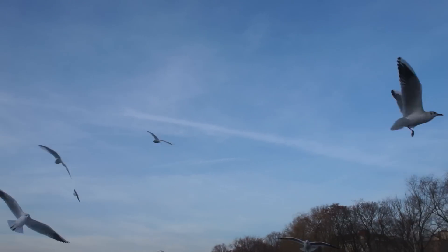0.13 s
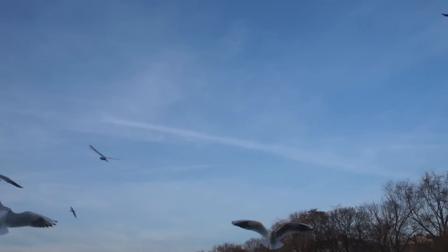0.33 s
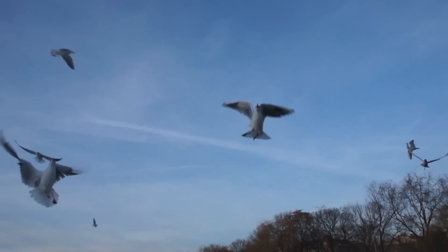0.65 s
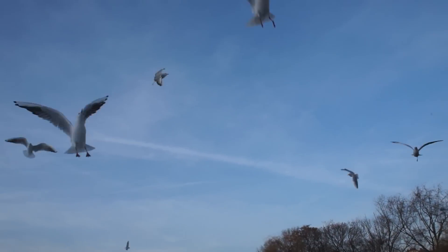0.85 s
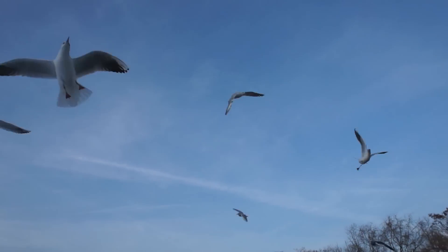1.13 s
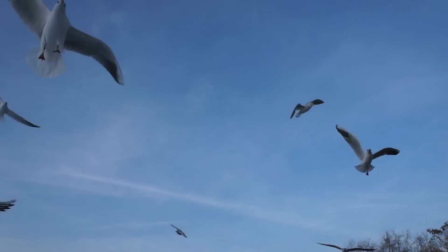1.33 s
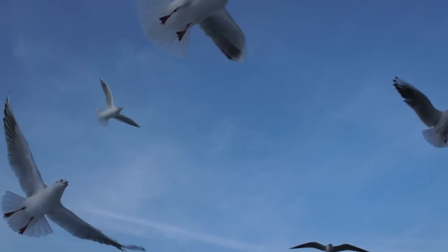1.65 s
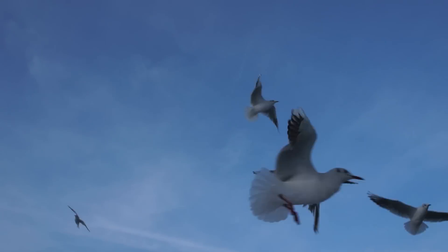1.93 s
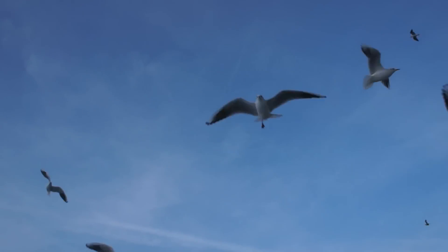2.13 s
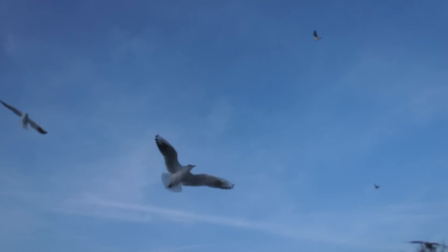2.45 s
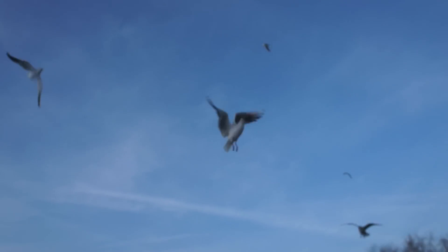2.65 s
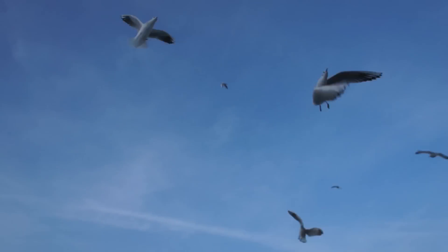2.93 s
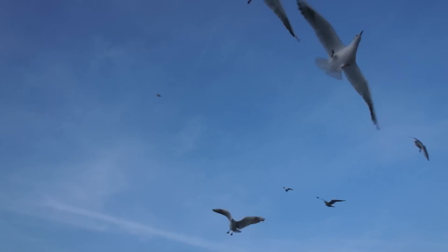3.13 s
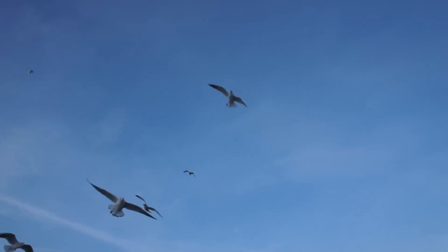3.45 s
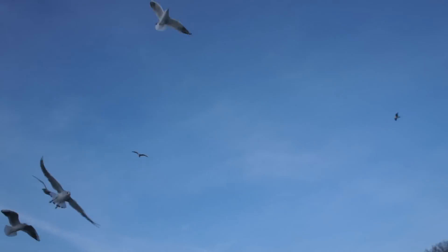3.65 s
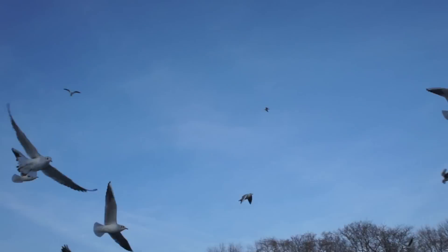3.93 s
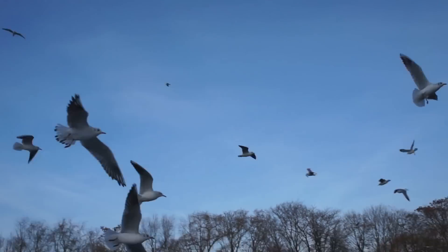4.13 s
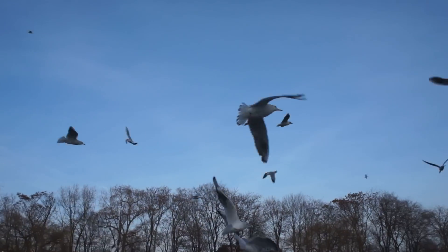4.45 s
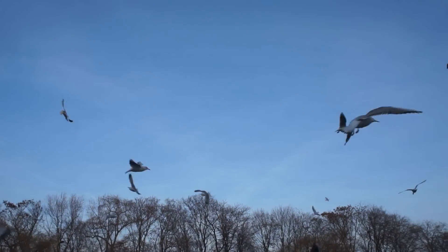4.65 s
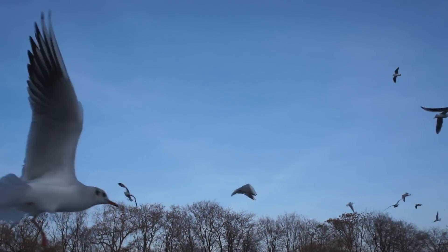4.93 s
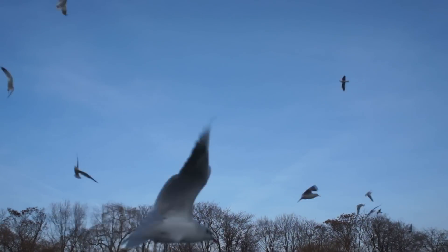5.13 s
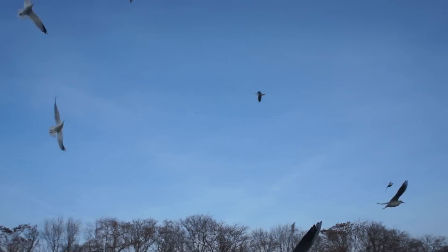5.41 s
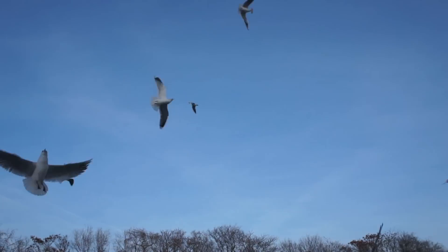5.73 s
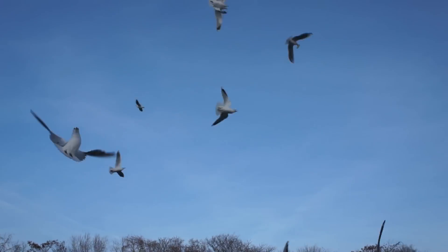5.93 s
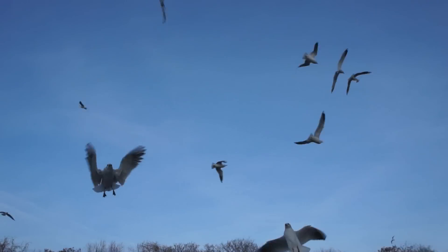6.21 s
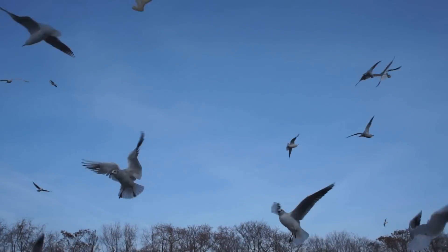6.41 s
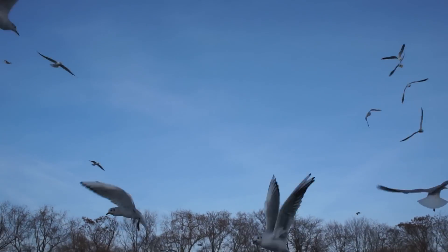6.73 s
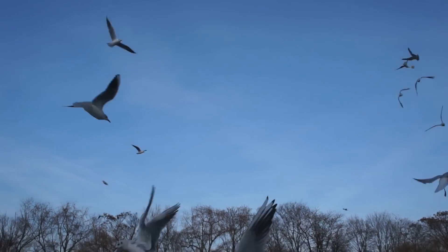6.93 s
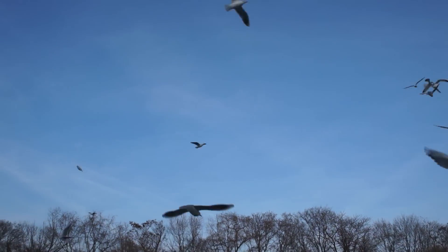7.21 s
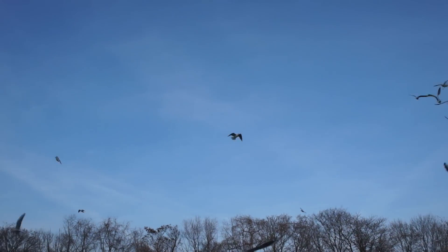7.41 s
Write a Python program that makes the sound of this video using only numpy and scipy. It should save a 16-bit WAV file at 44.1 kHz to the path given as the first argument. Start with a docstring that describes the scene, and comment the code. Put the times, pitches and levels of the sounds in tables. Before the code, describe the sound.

A steady outdoor hiss, a low rumble and the swelling wash of a distant gull flock run throughout. From the start to about 2 seconds, near gulls give a quick, overlapping string of short, harsh squawks, with a thin whistle around 1.6 seconds. Dull wingbeats thump irregularly all along, with occasional feather rustles and small wing snaps, clearest near 3.2 seconds. From about 2.5 to 4.5 seconds, farther birds cackle softly with a light echo from the trees, and close squawks are sparser. High, quavering whistles come at about 4 and 5.4 seconds. The loudest runs from 5.7 to 6.4 seconds, falling slightly and splitting into several tones, among squawks and short yelps. A softer whistle follows from 6.6 to 7.2 seconds. A low breeze builds on the microphone from 6.5 seconds, and a last squawk and whistle sound near 7.5 seconds.

```python
"""Open air under a wheeling flock of gulls. Near birds squawk and yelp: a rattling syrinx buzz shaped
by the throat. Their thin, mostly falling whistles split at times as a second membrane joins in.
Farther birds cackle, and trees echo the calls. Wings thump and snap, feathers rustle as birds brake.
Behind lie steady hiss, outdoor rumble and the wash of the far flock; a breeze rises at the end."""
import sys
import numpy as np
from scipy import signal
from scipy.fft import rfft, irfft, next_fast_len
from scipy.io import wavfile
from scipy.ndimage import uniform_filter1d, map_coordinates

SR = 44100
rng = np.random.default_rng(int(sys.argv[2]) if len(sys.argv) > 2 else 0)


def int16_out(signal):
    """Quantize to a 16-bit WAV file."""
    q = np.round(np.clip(np.atleast_2d(signal).T, -1, 1) * 32767)
    wavfile.write(sys.argv[1], SR, q.astype(np.int16))


N = 333837

# left-right correlation of the background: f/Hz, correlation
AMBIENT_CORRELATION = [(60, 0.6), (150, 0.81), (360, 0.92), (870, 0.66), (2140, 0), (5220, -0.34),
                       (12800, 0.16)]
# one contour per whistle: t/s, pitch/Hz, level/dB
WHISTLE_CONTOURS = [
    [(1.585, 3710, -20), (1.625, 3720, -19.5), (1.676, 3680, -19.5), (1.71, 3250, -31)],
    [(3.93, 2970, -28), (3.968, 3360, -22), (4.025, 3460, -25.5), (4.072, 3380, -25.5), (4.116, 2925, -29),
     (4.17, 2795, -29.5), (4.228, 2910, -38), (4.24, 2700, -37)],
    [(5.35, 3440, -53), (5.39, 3960, -32.5), (5.422, 4270, -20.5), (5.47, 4140, -21), (5.53, 4020, -21.5),
     (5.55, 3730, -39), (5.6, 3300, -41)],
    [(5.69, 3000, -40), (5.7, 3054, -13.5), (5.722, 3160, -14), (5.75, 3444, -26.5), (5.822, 3470, -25.5),
     (5.852, 3153, -11), (5.952, 2930, -15), (6.052, 2926, -17), (6.164, 2840, -20), (6.204, 2830, -28.5),
     (6.298, 2870, -20), (6.344, 2794, -27), (6.356, 2875, -45), (6.4, 2904, -39)],
    [(6.59, 3434, -26.5), (6.645, 3230, -36.5), (6.732, 3105, -24), (6.796, 2976, -25), (6.84, 3075, -24),
     (6.885, 2985, -25), (7.04, 3075, -24.5), (7.085, 2870, -22), (7.18, 2870, -29)],
    [(6.865, 3050, -32), (6.901, 2740, -29), (6.98, 2450, -36)],
    [(7.48, 3700, -30), (7.49, 3644, -18.5), (7.538, 3650, -13), (7.565, 3760, -19)],
]


def amp(db):
    """Decibels to gain."""
    return 10 ** (np.asarray(db) / 20)


def unit(x):
    """Scale to rms 1."""
    return x / np.sqrt(np.mean(x ** 2) + 1e-20)


def along(points, hz):
    """Interpolate (f/Hz, value) points on a log axis."""
    f, values = np.transpose(points)
    return np.interp(np.log(hz + 1), np.log(f + 1), values)


def curves(rows, t):
    """Interpolate each column after the first at times t."""
    times, *columns = np.transpose(rows)
    return [np.interp(t, times, column) for column in columns]


def wobble(rate_hz, size):
    """Smooth random curve, rate_hz knots a second."""
    knots = rng.standard_normal(int(size * rate_hz / SR) + 4)
    return map_coordinates(knots, [np.arange(size) * rate_hz / SR])


def filtered(x, response):
    """Apply a frequency response."""
    size = x.shape[-1]
    padded = next_fast_len(size + 4096)
    hz = np.fft.rfftfreq(padded, 1 / SR)
    return irfft(rfft(x, padded) * response(hz), padded)[..., :size]


def resonance(hz, centre_hz, q):
    """Band-pass gain with steep skirts."""
    ratio = (hz + 1) / centre_hz
    return 1 / (1 + (q * (ratio - 1 / ratio)) ** 2)


def fade(t, start, end, edge):
    """Soft-edged window from start to end."""
    return np.sin(np.pi / 2 * np.clip(np.minimum(t - start, end - t) / edge, 0, 1)) ** 2


def add(out, start_s, sound, pan_db=0):
    """Mix a sound in; pan is left minus right."""
    first = max(round(start_s * SR), 0)
    part = out[:, first:first + sound.shape[-1]]
    part += (sound * amp([[pan_db / 2], [-pan_db / 2]]))[:, :part.shape[1]]


def two_ports(phase, lead_rad):
    """A tone at two microphone ports, the left leading."""
    return np.sqrt(2) * np.sin(phase + lead_rad * np.array([[.5], [-.5]]))


def puff(length_s, rise_s):
    """Two noise channels with a fast rise and exponential decay."""
    t = np.arange(SR // 6) / SR
    noise = rng.standard_normal((2, len(t)))
    return noise * (1 - np.exp(-t / rise_s)) * np.exp(-2 * t / max(length_s, .004))


def rush(spectrum, correlation, patchy_db):
    """Stereo noise of rms 1 with random gain patches in time and frequency."""
    def mid_side(hz):
        angle = np.arccos(np.clip(along(correlation, hz), -1, 1)) / 2
        return amp(along(spectrum, hz)) * [np.cos(angle), np.sin(angle)]

    bins = signal.stft(rng.standard_normal((2, N)), nperseg=512)[2]
    patches = uniform_filter1d(rng.standard_normal(bins.shape[1:]), size=4, axis=0)
    patches = unit(uniform_filter1d(patches, size=8, axis=1))
    noise = signal.istft(bins * amp(patchy_db * patches), nperseg=512)[1][:, :N]
    mid, side = filtered(noise, mid_side)
    return unit(np.array([mid + side, mid - side]))


def hiss(level_db=-43.5, drift_db=1.5):
    """Broad hiss, drifting slightly in level."""
    spectrum = [(30, -21), (200, 3), (800, 4.5), (2500, 7), (5000, 4), (8000, 5), (11500, 3), (12300, -16),
                (13200, -30)]  # f/Hz, density/dB
    gain = amp(level_db + drift_db * wobble(6, N))
    return gain * rush(spectrum, AMBIENT_CORRELATION, patchy_db=1.5)


def rumble(flutter_db, level_db=-41.5):
    """Distant outdoor rumble, a little to the right."""
    spectrum = [(25, -24), (60, -18), (140, -7), (250, 2), (400, -2.5), (700, -6), (1200, -11), (3000, -41)]  # f/Hz, density/dB
    noise = rush(spectrum, AMBIENT_CORRELATION, patchy_db=3.5)
    return amp(level_db + flutter_db) * noise * amp([[-1.2], [1.2]])


def breeze(gust_db=5.5):
    """Low gusts of wind at the microphone."""
    spectrum = [(20, -59), (50, -10), (90, -5.5), (140, -0.5), (220, -2.5), (400, -17.5), (900, -63)]  # f/Hz, density/dB
    strength = [(0, -62), (.65, -41), (1.05, -67), (3.1, -68), (3.7, -56), (4.3, -73), (5.9, -67),
                (6.45, -54), (6.6, -42.5), (7.2, -33.5), (7.57, -25.5)]  # t/s, level/dB
    level_db, = curves(strength, np.arange(N) / SR)
    gain = amp(level_db + gust_db * wobble(12, N))
    return gain * rush(spectrum, correlation=[(100, -0.52)], patchy_db=2) * amp([[-4], [2.5]])


def far_flock(flutter_db):
    """The far flock blurs into a swelling wash."""
    spectrum = [(60, -59), (300, -22), (700, -4), (1000, -0.5), (1800, 0.5), (2600, -10.5), (4500, -11.5),
                (9000, -46)]  # f/Hz, density/dB
    swells = [(0, -38.5), (.8, -37), (1.15, -34), (1.7, -33.5), (2.2, -43.5), (2.8, -36), (3.7, -47.5),
              (4.2, -37.5), (4.5, -45), (5.35, -42.5), (6.2, -43), (6.6, -49), (7.1, -37.5), (7.57, -38.5)]  # t/s, level/dB
    level_db, = curves(swells, np.arange(N) / SR)
    return amp(level_db + 1.1 * flutter_db) * rush(spectrum, AMBIENT_CORRELATION, patchy_db=3.5)


def tree_echo(x):
    """Diffuse echo from the bank and the trees."""
    decay = [(200, 0.16), (2000, 1), (10000, 0.99)]  # f/Hz, T60/s
    hz, t, bins = signal.stft(rng.standard_normal((2, SR // 2)), SR, nperseg=256)
    tail = signal.istft(bins * amp(-60 * t / along(decay, hz)[:, None]), SR, nperseg=256)[1]
    return signal.fftconvolve(x, tail / np.linalg.norm(tail[0]), axes=1)[:, :N]


def hum(start_s=4.622, start_hz=170, level_db=-33):
    """One brief, low, rising hum."""
    out = np.zeros((2, N))
    t = np.arange(0, .055, 1 / SR)
    tone = np.sin(2 * np.pi * start_hz * t * (1 + 1.5 * t))
    add(out, start_s, amp(level_db) * tone * fade(t, 0, t[-1], 0.0072))
    return out


def wing_beats(far_count=14, far_db=-40, far_hz=350, crest_db=15):
    """Down strokes push dull puffs of air; the far ones fall at random."""
    near = [(.346, -25, 242, -1), (.488, -22.5, 340, 0), (.625, -27, 277, 1), (1.135, -29, 276, -2),
            (2.201, -23, 405, 1), (2.343, -22, 335, 0), (2.521, -29.5, 476, 2), (2.692, -24.5, 347, -.5),
            (2.987, -24, 547, 0), (3.21, -28.5, 395, -1), (3.568, -19.5, 358, 0), (3.611, -22.5, 744, -3),
            (4.069, -30, 480, 2), (4.324, -24, 382, 1), (4.498, -42, 865, 5), (4.611, -27.5, 444, 1),
            (4.866, -21, 900, 3), (4.924, -24, 740, 0), (4.981, -22.5, 660, 3), (5.087, -30, 433, 2),
            (5.937, -30, 296, 1), (6.916, -25, 285, 2), (7.215, -20.5, 268, -7), (7.439, -24, 334, -7),
            (7.493, -20, 223, -18.5)]  # t/s, nominal peak/dB, centre/Hz, pan/dB
    far = [(when * N / SR, far_db, far_hz * 2 ** (high - .5), 4 * (left - .5))
           for when, high, left in rng.random((far_count, 3))]
    out = np.zeros((2, N))
    for start_s, peak_db, centre_hz, pan_db in near + far:
        air = puff(length_s=0.045, rise_s=0.0017)
        mid, side = filtered(air, lambda hz: resonance(hz, centre_hz, 1.39) ** 0.75)
        thump = np.array([mid + 0.15 * side, mid - 0.39 * side])
        add(out, start_s, amp(peak_db - crest_db) * unit(thump), pan_db)
    return out


def feathers():
    """Stiff feathers crackle as they spread."""
    rustles = [(0.261, -15.5, 0.0075), (1.089, -19.5, 0.11), (1.144, -17.5, 0.11), (1.994, -24, 0.078),
               (2.696, -21.5, 0.043), (2.983, -26.5, 0.026), (3.108, -17.5, 0.16), (3.198, -17, 0.082),
               (3.66, -19, 0.0073), (6.982, -21, 0.035), (7.202, -21, 0.045), (7.329, -17.5, 0.11)]  # t/s, peak/dB, length/s
    out = np.zeros((2, N))
    for start_s, peak_db, length_s in rustles:
        grains = puff(length_s, rise_s=0.0025)
        grains *= amp(3.6 * wobble(666, grains.shape[1]))
        mid, side = filtered(grains, lambda hz: resonance(hz, 1870, 0.18))
        rustle = np.array([mid + 1.05 * side, mid - 0.54 * side])
        add(out, start_s, amp(peak_db) * rustle / np.abs(rustle).max())
    return out


def wing_snaps():
    """Wing tips snap with small clicks."""
    snaps = [(.348, -27), (2.203, -27), (2.35, -24.5), (3.207, -16.5), (4.326, -34), (4.621, -31),
             (4.847, -24.5), (4.877, -25), (5.254, -25.5), (5.965, -20.5), (7.501, -38)]  # t/s, peak/dB
    out = np.zeros((2, N))
    for start_s, peak_db in snaps:
        burst = puff(length_s=0.0086, rise_s=0.00047)[0]
        click = filtered(burst, lambda hz: resonance(hz, 690, 1) ** 0.45)
        add(out, start_s, amp(peak_db) * click / np.abs(click).max())
    return out


def syrinx(pitch_hz, effort, rattle_hz, rough, jitter=0.0627, sag=0.22, leap=.07, slip=0.51, rasp=2.1):
    """Harmonic buzz in uneven bursts; each starts on its own pitch, out of step, and sags."""
    size = len(pitch_hz)
    turns = np.cumsum(rattle_hz * (1 + 0.11 * wobble(91.3, size))) / SR + rng.random()
    within, burst = turns % 1, np.abs(turns).astype(int)
    offset, restart = rng.standard_normal((burst.max() + 1, 2))[burst].T
    detune = jitter * wobble(887.6, size) + leap * offset + sag * (.5 - within)
    hz = pitch_hz * (1 + rough * detune)
    cycles = np.cumsum(hz) / SR + uniform_filter1d(slip * rough * restart, size=40)
    harmonics = np.arange(1, 14)[:, None]
    flicker_db = 7 * np.minimum(rough, .5) * np.array([wobble(123.3, size) for _ in harmonics])
    strength = amp(flicker_db) * effort ** (0.023 * harmonics)  # high harmonics need effort
    buzz = unit((strength * np.cos(2 * np.pi * harmonics * cycles)).sum(axis=0))
    air = unit(rng.standard_normal(size) * (4.1 + np.cos(2 * np.pi * cycles))) * effort
    harsh = np.clip(rough / 0.34, 0, 1)  # gentle calls barely rattle
    gate = 1 - harsh * .9 * (1 - fade(within, 0, 1, .28))
    return (buzz + rasp * rough * air) * gate * amp(0.16 * harsh * wobble(217, size))


def throat(hz, centre_hz, q, edge_hz):
    """Response of the tract: it rings after each pulse and passes less above its edge."""
    colour = [(400, 14.5), (900, -3), (1800, 2), (3000, 3), (4500, 6), (7000, 8), (9000, 12), (12000, -3)]  # f/Hz, gain/dB
    ring = 1 / (1 + 1j * q * ((hz + 1) / centre_hz - centre_hz / (hz + 1))) ** 2
    shelf = .2 + 1 / (1 + (hz / edge_hz) ** 16)
    return amp(along(colour, hz)) * ring * shelf


def call(length_s, pitch_hz, rise, throat_hz, edge_hz, rough, pan_db, q, arch=.15, bill_hz=10300):
    """One call arches in pitch, swells and breaks up; air hisses in the bill, the neck growls."""
    u = np.linspace(0, 1, max(round(length_s * SR), 256))
    contour_hz = pitch_hz * (1 + rise * (u - .5) - arch * (2 * u - 1) ** 2)
    effort = amp(-32 * (u - .54) ** 2)
    breaking = np.clip(rough, 0, 1) * (1 + 2 * fade(u, 0, np.inf, .3)) / 3
    source = syrinx(contour_hz, effort, rattle_hz=pitch_hz / 10.4, rough=breaking)
    source *= effort * fade(u, 0, 1, 0.14)
    lead_rad = 1 + 0.75 * pan_db  # between the microphone ports, at 2 kHz
    ports = lambda hz: np.exp(1j * lead_rad * np.minimum(hz / 2000, 1.4) * np.array([[-.5], [.5]]))
    voice = unit(filtered(source, lambda hz: throat(hz, throat_hz, q, edge_hz) * ports(hz)))
    breath = np.abs(source) * rng.standard_normal((2, len(u)))
    bill_hiss = unit(filtered(breath, lambda hz: resonance(hz, bill_hz, 0.84)))
    bill_hiss *= amp(-15) * edge_hz / bill_hz * np.clip(rough / 0.16, 0, 1)
    shake = np.abs(source) * rng.standard_normal(len(u))
    growl = unit(filtered(shake, lambda hz: resonance(hz, 1020, 0.55)))
    growl *= amp(-15) * np.clip(rough / 0.36, 0, 1)
    return amp(2) * (voice + bill_hiss + growl)


def cackles(faint_count=6, faint_span_s=(2.4, 4.9), faint_hz=803, faint_db=-44.5, pan_db=-0.5):
    """Farther birds: distance leaves one or two harmonics; a few faint ones call at random."""
    calls = [(0, 0.053, 665, 0.045, -37.5, 1310), (.733, 0.036, 724, -0.2, -38, 1290),
             (1.109, 0.048, 789, -0.27, -34.5, 1410), (2.585, 0.12, 1064, -0.049, -40, 2050),
             (2.83, .15, 1028, -0.083, -43.5, 1960), (2.912, 0.094, 860, .25, -37, 770),
             (3.025, .1, 752, -0.096, -46, 1450), (3.128, 0.1, 825, 0.1, -36, 1630),
             (3.225, 0.07, 906, 0.35, -35, 810), (3.262, 0.065, 852, 0.025, -33.5, 1650),
             (3.345, 0.04, 885, 0.24, -37, 870), (3.375, 0.075, 842, -0.15, -41.5, 1570),
             (3.485, 0.096, 918, 0.097, -39, 1700), (3.62, 0.069, 850, -0.024, -44.5, 1600),
             (3.775, 0.064, 860, 0.3, -43.5, 1530), (3.935, 0.11, 929, 0.29, -37.5, 1600),
             (4.385, 0.06, 957, 0.076, -45, 1850), (4.497, 0.025, 958, 0.12, -38.5, 920)]  # t/s, length/s, pitch/Hz, rise/pitch, gain/dB, throat/Hz
    faint = []
    for when, high, slope in rng.random((faint_count, 3)):
        start_s = np.interp(when, [0, 1], faint_span_s)
        pitch_hz = faint_hz * 2 ** (0.45 * (high - .5))
        faint.append((start_s, .08, pitch_hz, slope - .5, faint_db, 1600))
    out = np.zeros((2, N))
    for start_s, length_s, pitch_hz, rise, gain_db, throat_hz in calls + faint:
        cackle = call(length_s, pitch_hz, rise, throat_hz,
                      edge_hz=2100, rough=0.244, pan_db=pan_db, q=1.8, arch=0.26)
        add(out, start_s, amp(gain_db) * cackle, pan_db)
    return out


def second_voice(fitful_db=4.5):
    """A second, lower membrane speaks in fits and splits a whistle into sum and difference tones."""
    # start/s, end/s, pitch/whistle pitch, sum tone/dB, difference/dB re sum, upper sum/dB re sum
    entries = [(4.095, 4.232, 0.13, -41, -17, -1), (5.725, 5.777, 0.34, -28.5, -12, -17),
               (5.765, 5.838, 0.39, -19, -40, -22), (5.98, 6.001, .5, -36, -5, -20),
               (6.024, 6.051, .49, -27.5, -9, -15), (6.063, 6.168, 0.49, -30, -11.5, -19),
               (6.186, 6.305, 0.48, -35, -12, -13)]
    out = np.zeros((2, N))
    for start_s, end_s, ratio, sum_db, difference_db, upper_db in entries:
        t = np.arange(start_s, end_s, 1 / SR)
        contour = [rows for rows in WHISTLE_CONTOURS if rows[0][0] < start_s][-1]
        pitch_hz = curves(contour, t)[0]
        ragged = 0.0027 / ratio * wobble(300, len(t))  # grows as the membrane slackens
        main = 2 * np.pi * np.cumsum(pitch_hz) / SR
        low = 2 * np.pi * np.cumsum(pitch_hz * (ratio + ragged)) / SR
        partials = [(main + low, 0), (main - low, difference_db), (2 * main + low, upper_db),
                    (main + 2 * low, -18), (2 * (main + low), -29)]
        tones = sum(amp(db) * two_ports(phase, lead_rad=1.1) for phase, db in partials)
        swell = np.sqrt(fade(t, start_s, np.inf, 0.23 * (end_s - start_s)))
        gain = amp(sum_db + fitful_db * wobble(33.6, len(t)))
        add(out, start_s, gain * tones * swell * fade(t, start_s, end_s, 0.006), pan_db=1)
    return out


def whistle(t, pitch_hz, levels_db, pan_db, lead_rad, waver_db=2.8, hoarse_db=-25):
    """A nearly pure, quavering, slightly hoarse tone; a weak period doubling comes and goes."""
    size = len(t)
    waver = wobble(55, size)  # moves pitch and level together
    quaver = 0.0054 * wobble(302, size) + 0.009 * waver
    phase = 2 * np.pi * np.cumsum(pitch_hz * (1 + quaver)) / SR
    tone = np.zeros((2, size))
    for k, level_db in enumerate(levels_db, start=1):
        flicker_db = waver_db * waver + 1.7 * (k - 1) * wobble(33, size)
        tone += amp(level_db + flicker_db) * two_ports(k * phase, k * lead_rad)
    tone *= 1 + amp(hoarse_db) * wobble(1200, size)
    doubling_db = levels_db[0] - 38 + 15 * wobble(24.4, size)
    doubling = amp(doubling_db) * (np.sin(3 * phase / 2) + 0.41 * np.sin(phase / 2))
    return (tone + doubling) * amp([pan_db / 2, -pan_db / 2]) * fade(t, t[0], t[-1], 0.0054)


def whistles(dulling_db_per_s=21.5):
    """Long begging whistles, brightest at the start, from birds drifting past."""
    # per whistle: 2nd, 3rd harmonic/dB re 1st; start, end pan/dB; start, end left lead/rad
    birds = [(-13.5, -21.5, -2, 0, -2.5, -2.6), (-10, -14, -2.5, -5, -2.5, -1.7),
             (-13.5, -36, 1.5, 7.5, -2.5, -0.5), (-3, -26, 3, -13.5, 1.6, -1.1),
             (-5, -46, -5, -4.5, -1.3, -1.5), (-4.5, -39, 2, -7, -2, 0), (-11.5, -23.5, 3.5, -1, -3, -2.5)]
    out = np.zeros((2, N))
    for contour, (second_db, third_db, *path) in zip(WHISTLE_CONTOURS, birds):
        t = np.arange(contour[0][0], contour[-1][0], 1 / SR)
        pitch_hz, level_db = curves(contour, t)
        dulled_db = level_db - dulling_db_per_s * (t - t[0])
        levels_db = [level_db, dulled_db + second_db, dulled_db + third_db]
        pan_db = np.linspace(*path[:2], len(t))
        lead_rad = np.linspace(*path[2:], len(t))
        add(out, t[0], whistle(t, pitch_hz, levels_db, pan_db, lead_rad))
    return out


def yelps():
    """Short, clean, rising calls from near birds."""
    calls = [(5.65, 0.046, 1153, -24.5, 7700, 0.5), (6.615, 0.035, 1118, -39.5, 2500, -3),
             (6.843, 0.035, 1144, -30.5, 2540, 0.5), (7.16, 0.039, 1197, -31, 2540, 0.5)]  # t/s, length/s, pitch/Hz, gain/dB, edge/Hz, pan/dB
    out = np.zeros((2, N))
    for start_s, length_s, pitch_hz, gain_db, edge_hz, pan_db in calls:
        yelp = call(length_s, pitch_hz, rise=0.13, throat_hz=2650,
                    edge_hz=edge_hz, rough=0.15, pan_db=pan_db, q=0.86)
        add(out, start_s, amp(gain_db) * yelp, pan_db)
    return out


def squawks():
    """Near birds squawk harshly through a wide throat."""
    # t/s, length/s, pitch/Hz, rise/pitch, gain/dB, throat/Hz, edge/Hz, roughness/0-1, pan/dB
    calls = [(0.07, 0.099, 910, 0.087, -37.5, 2450, 4000, 0.7, -1),
             (0.127, 0.088, 968, -0.019, -18.5, 2440, 4340, 0.43, 0),
             (0.185, 0.076, 959, .06, -22.5, 2490, 4200, 0.53, 0),
             (0.372, .048, 919, 0.16, -18, 2500, 5070, 0.25, 1),
             (0.831, 0.11, 981, 0.029, -17, 2430, 7200, 0.23, -0.5),
             (0.921, 0.1, 981, 0.063, -17.5, 2330, 7700, 0.25, -0.5),
             (1.175, 0.071, 817, -0.039, -20, 1880, 4700, 0.31, 0.5),
             (1.251, 0.062, 992, 0.14, -21, 1930, 6000, 0.26, 0),
             (1.292, 0.044, 768, -0.24, -22, 1770, 5500, 0.87, -0.5),
             (1.305, .114, 901, -.01, -19.5, 1890, 6330, 0.3, -1),
             (1.488, .098, 1117, 0.47, -19, 2630, 7240, 0.5, -0.5),
             (1.553, 0.057, 827, 0.039, -19.5, 1820, 6650, 0.17, -1),
             (1.707, 0.08, 1130, 0.32, -18.5, 1870, 7300, 0.48, -0.5),
             (1.844, 0.068, 1012, 0.051, -24.5, 1810, 3760, 0.34, 0.5),
             (2.792, 0.061, 984, 0.035, -25.5, 1580, 3700, 0.31, 0.5),
             (3.466, 0.055, 914, 0.08, -32, 1220, 4400, 0.5, -4),
             (4.12, 0.16, 957, .25, -35.5, 3900, 7500, 0.41, -0.5),
             (4.349, 0.053, 1038, -0.072, -24.5, 2100, 2720, 0.35, 0.5),
             (4.586, 0.059, 765, 0.094, -33.5, 1400, 2330, 0.48, 1.5),
             (4.71, 0.069, 1100, 0.12, -32.5, 1840, 6100, 0.93, 0.5),
             (5.396, 0.1, 938, 0.19, -24.5, 1650, 6600, 0.28, 2.5),
             (6.152, 0.09, 1042, 0.0045, -20.5, 2656, 6100, 0.3, -0.5),
             (6.292, 0.064, 1249, .2, -23, 2480, 2980, 0.17, -0.5),
             (6.413, 0.033, 843, 0.12, -28, 1540, 4030, 0.9, 3),
             (6.947, 0.068, 1025, -0.061, -30.5, 1760, 3970, 0.85, 1),
             (7.455, 0.13, 742, -0.014, -23.5, 3370, 10400, 0.19, 2.5)]
    out = np.zeros((2, N))
    for start_s, length_s, pitch_hz, rise, gain_db, throat_hz, edge_hz, rough, pan_db in calls:
        squawk = call(length_s, pitch_hz, rise, throat_hz, edge_hz, rough, pan_db, q=0.94)
        add(out, start_s, amp(gain_db) * squawk, pan_db)
    return out


def scene():
    """Calls and wings over the outdoor background; far birds carry more echo."""
    near = squawks() + yelps() + whistles() + second_voice()
    far = cackles()
    echo = tree_echo(amp(-22) * near + amp(-10.5) * far)
    wings = wing_beats() + feathers() + wing_snaps()
    flutter_db = wobble(14, N)
    background = breeze() + rumble(flutter_db) + far_flock(flutter_db) + hiss()
    return background + echo + hum() + wings + far + near


def record(dry, ceiling=.95, top_hz=13200, rolloff_hz=700):
    """The loudest whistle peaks are softly rounded off; the treble ends steeply at the band limit."""
    limited = dry / (1 + np.abs(dry / ceiling) ** 8) ** (1 / 8)
    return filtered(limited, lambda hz: np.clip((top_hz - hz) / rolloff_hz, 0, 1) ** 2)


dry = scene()
out = record(dry)
int16_out(out)
```